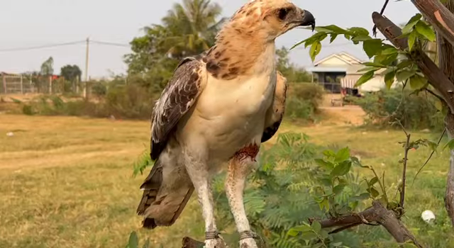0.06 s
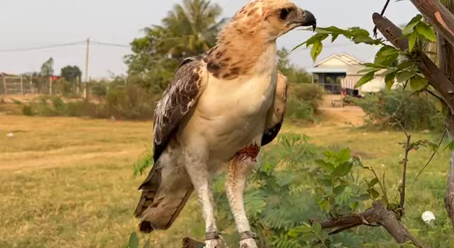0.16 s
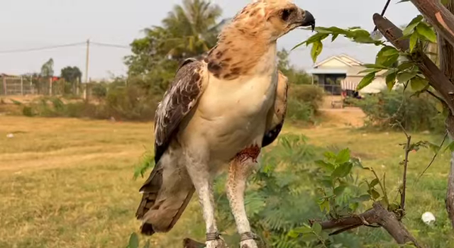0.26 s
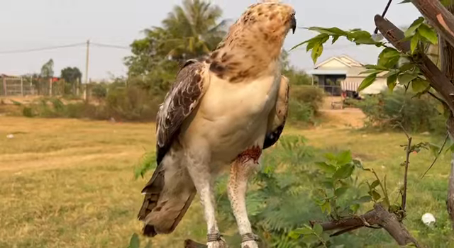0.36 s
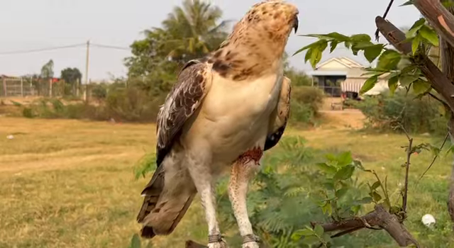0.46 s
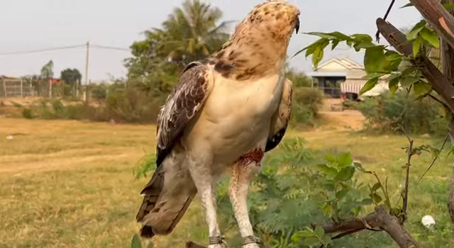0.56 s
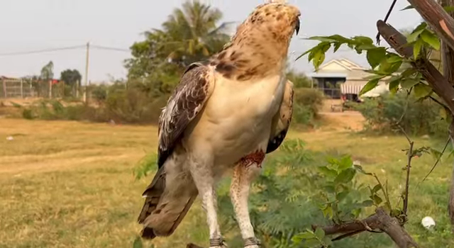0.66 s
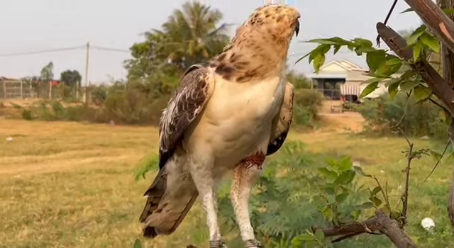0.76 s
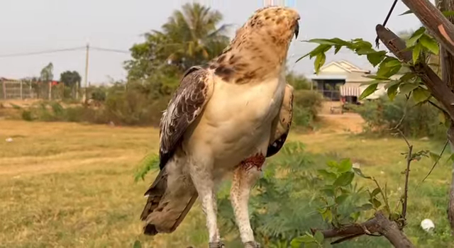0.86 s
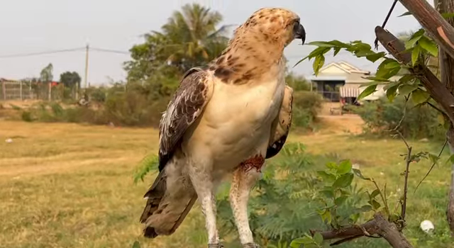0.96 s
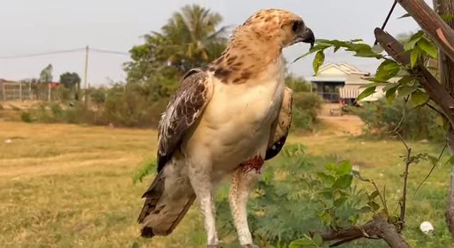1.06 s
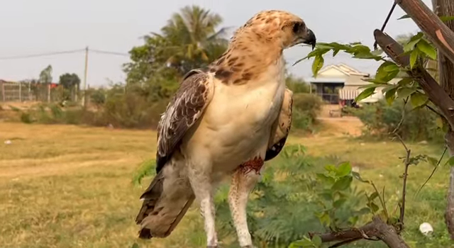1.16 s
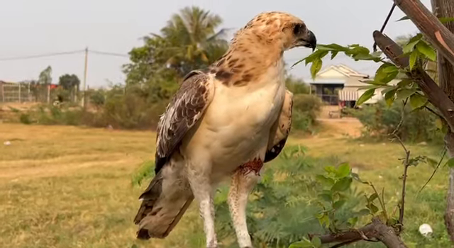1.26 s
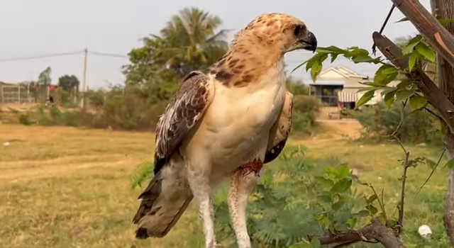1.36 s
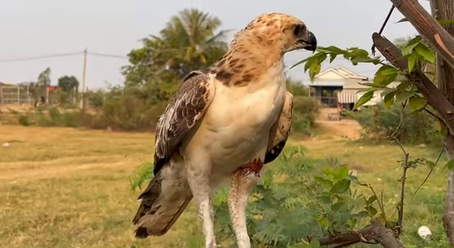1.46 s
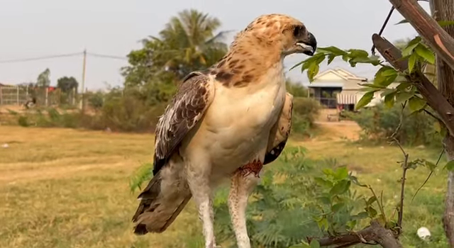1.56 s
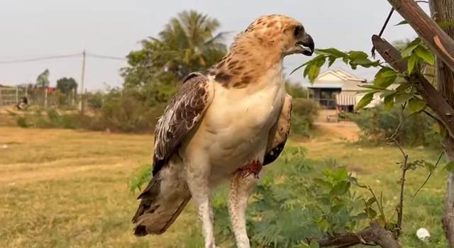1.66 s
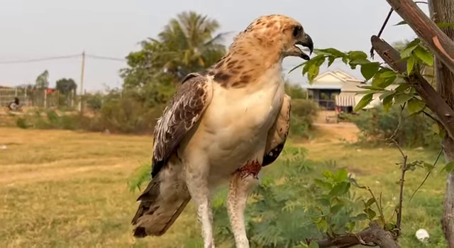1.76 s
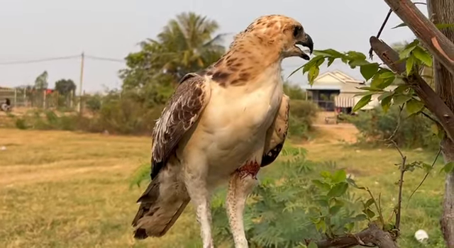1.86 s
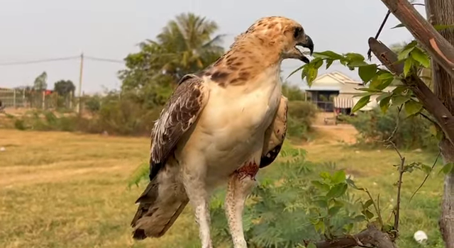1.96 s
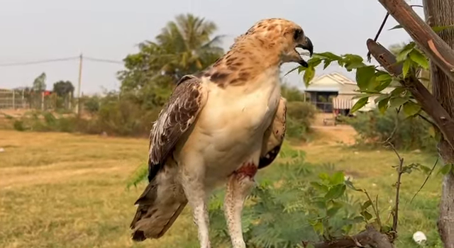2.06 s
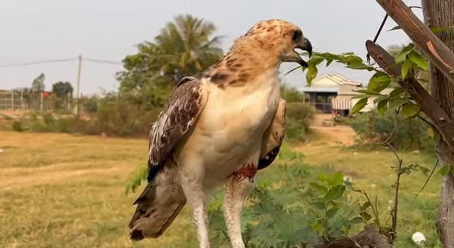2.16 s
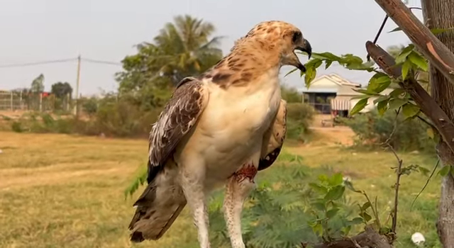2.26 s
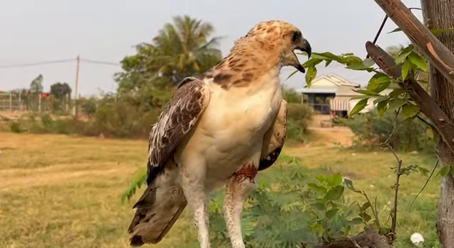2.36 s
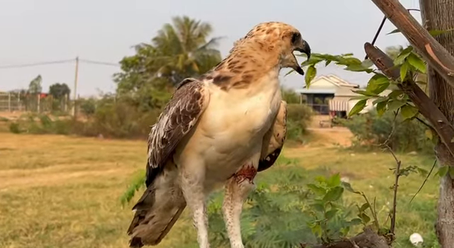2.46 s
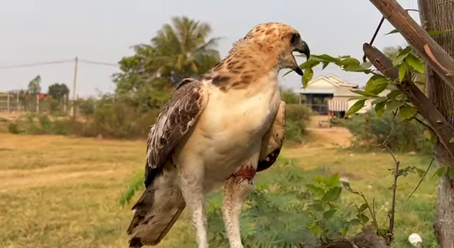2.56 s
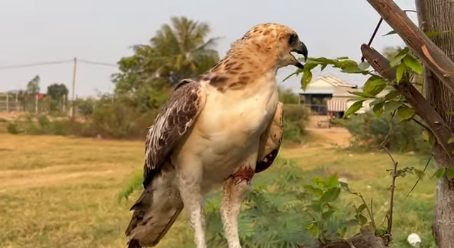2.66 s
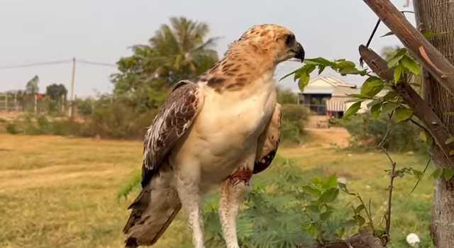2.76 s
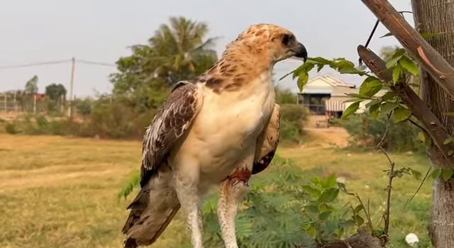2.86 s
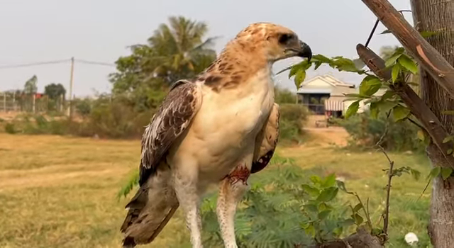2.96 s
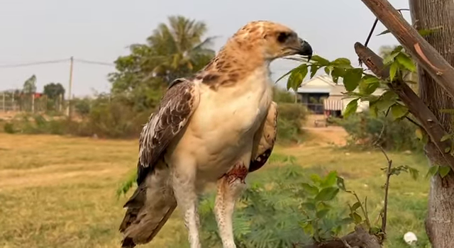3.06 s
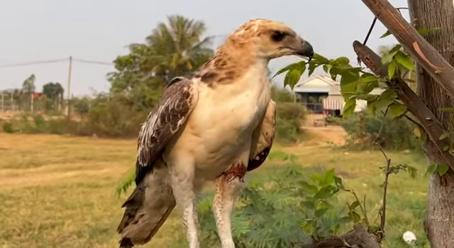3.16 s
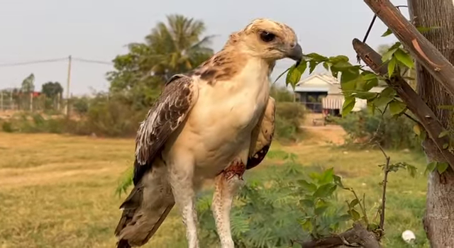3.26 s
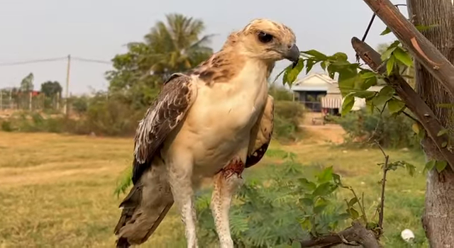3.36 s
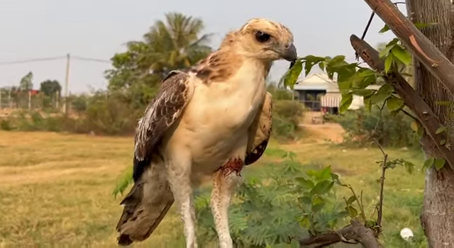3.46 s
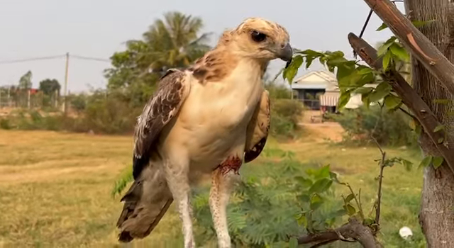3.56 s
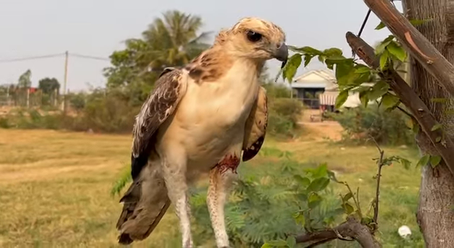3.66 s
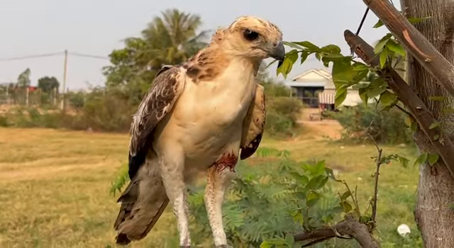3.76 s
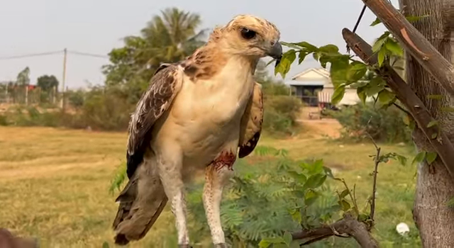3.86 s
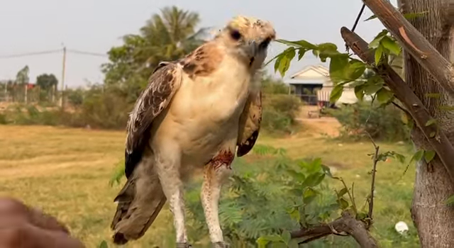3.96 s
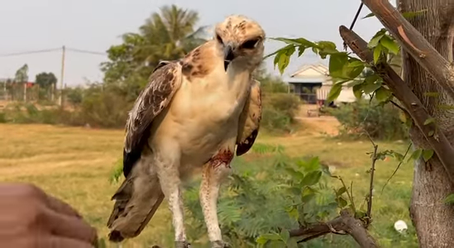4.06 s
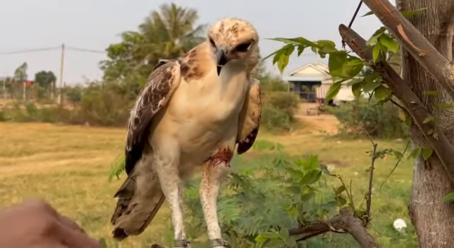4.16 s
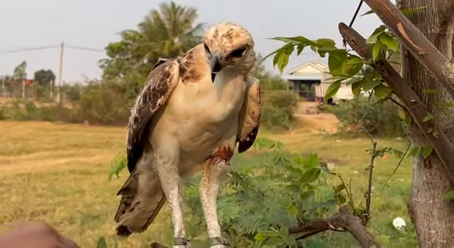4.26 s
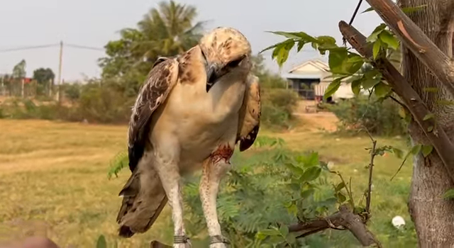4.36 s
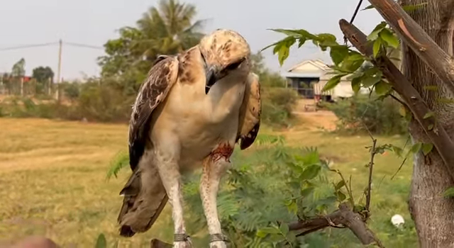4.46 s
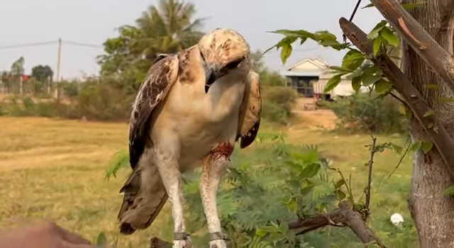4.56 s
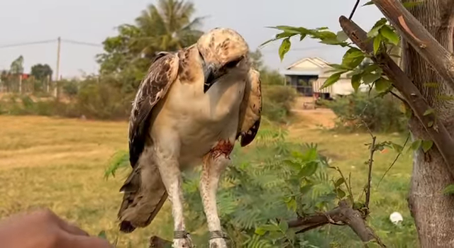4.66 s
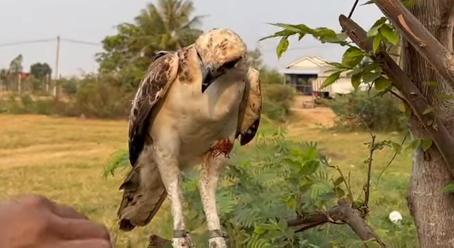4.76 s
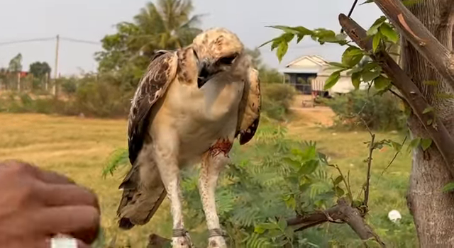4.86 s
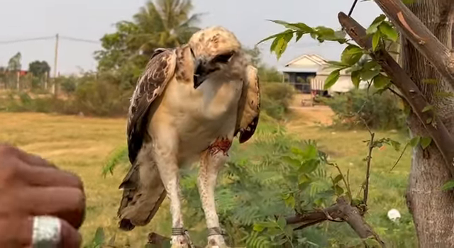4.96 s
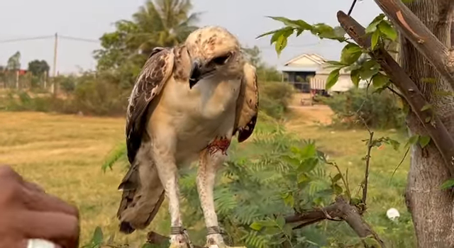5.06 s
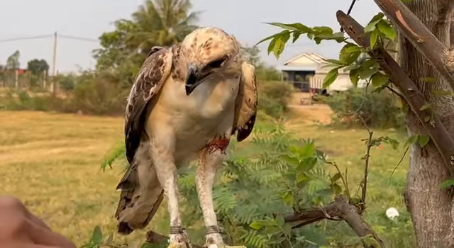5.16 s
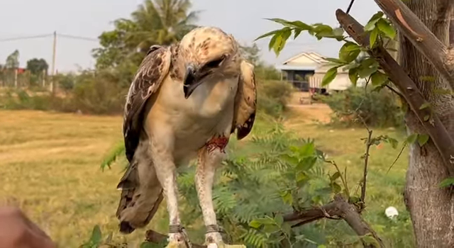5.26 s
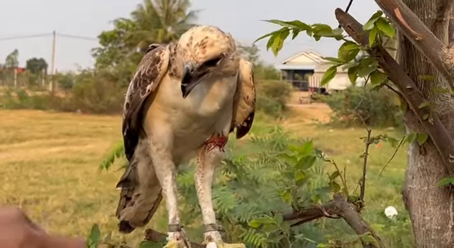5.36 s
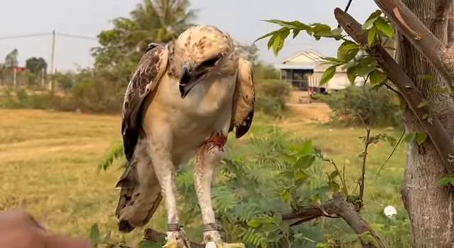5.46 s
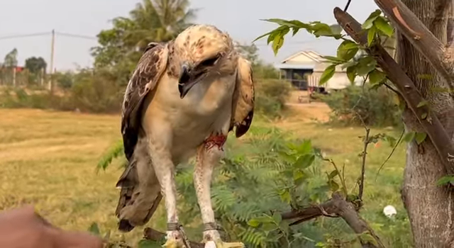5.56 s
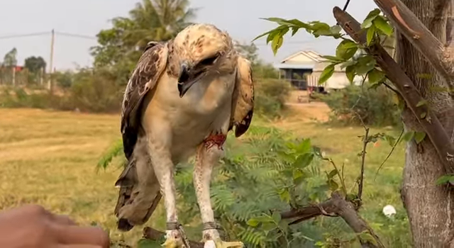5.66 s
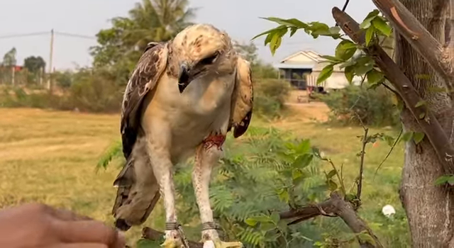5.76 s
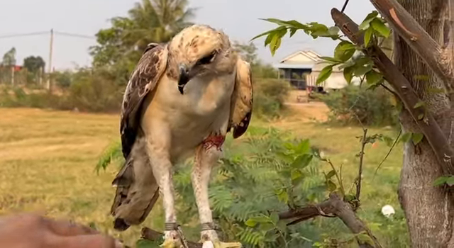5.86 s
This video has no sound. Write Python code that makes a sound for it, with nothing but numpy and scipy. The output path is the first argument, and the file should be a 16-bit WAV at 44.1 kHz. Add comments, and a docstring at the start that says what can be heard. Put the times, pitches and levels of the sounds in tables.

```python
"""An open field: a young eagle on a perch calls twice, close to a hand-held camera.
First a rising run of whistles, head turned aside, the last one breaking upward; then, facing the camera,
four brighter yelps, each led by a falling squeak. The voice is a gliding tone with overtones and some air.
Fingers rub and bump the camera (shaped noise, thuds) over low humming glides; leaves rustle, twigs and beak
tick (noise bands). Far off a dog yaps (blurred resonances); short high chirps glide, most from a small bird."""
import sys
import numpy as np
from scipy import signal
from scipy.fft import rfft, irfft, next_fast_len
from scipy.io import wavfile
from scipy.ndimage import map_coordinates

SR = 44100
rng = np.random.default_rng(int(sys.argv[2]) if len(sys.argv) > 2 else 0)


def bounce(signal):
    """Save signal as a 16-bit WAV file at the path given by the first command-line argument."""
    frames = np.transpose(np.atleast_2d(signal))
    limited = np.clip(frames, -1, 1)
    pcm = np.round(limited * 32767).astype(np.int16)
    wavfile.write(sys.argv[1], SR, pcm)


N = 260939

# spells in which the fingers shift on the camera: centre_s, half_width_s, rise_db over a still grip
FINGER_SHIFTS = [(0, 0.15, 9), (.3, .75, 10.5), (1.68, 0.44, 15), (2.6, 0.31, 10.5), (3.72, 0.3, 12.5),
                 (4.1, 0.16, 12.5), (4.75, 0.54, 13), (5.34, 0.088, 8)]
# colour of the handling rumble: freq_hz, relative_db
RUMBLE_COLOUR = [(20, -27), (35, -9), (55, 3.5), (95, 3.5), (145, -4.5), (240, -15), (450, -29), (800, -49),
                 (1300, -120)]
# fingers bump the camera: start_s, thud_db, knock_db relative to the thud (both before the bump trims)
FINGER_BUMPS = [(0.033, -29, -23), (0.175, -27.5, -20), (0.235, -25, -43), (0.331, -33, -30),
                (0.423, -33, -17), (0.513, -35, -19), (1.747, -29.5, -13.5), (1.866, -28, -18.5),
                (2.177, -31.5, -18), (2.796, -38, -19), (3.503, -34, -24), (3.669, -37.5, -13),
                (3.996, -31, -16.5), (4.074, -23.5, -39), (4.417, -30, -9), (5.331, -35, -21),
                (5.436, -30, -16), (5.794, -43, -22.5)]
# low humming glides: start_s, length_s, start_hz, end_hz, level_db
LOW_GLIDES = [(1.37, .13, 124.2, 108, -35), (1.64, 0.093, 100, 98.4, -34.5), (2.11, 0.11, 97.7, 103.3, -36),
              (2.3, 0.08, 122.4, 97, -37), (3.78, 0.16, 104.4, 82.1, -38), (4.04, 0.081, 139, 145.5, -32.5),
              (4.43, 0.29, 159.5, 109.3, -37), (4.65, 0.18, 106.3, 100.1, -34), (4.95, 0.12, 82, 78.2, -39)]
# the foliage's soft stir, before its trim: time_s, level_db
STIR_LEVEL = [(0.0, -60), (1.47, -62), (3.1, -68.5), (3.91, -65.5), (4.94, -68.5), (5.39, -63), (5.92, -76)]
# colour of the soft stir: freq_hz, relative_db
STIR_COLOUR = [(180, -31), (300, -4.5), (527, -6.5), (676, -4.5), (796, -9), (877, -7.5), (1490, -11),
               (4000, -22.5), (5200, -45), (8800, -120)]
# puffs of air in the leaves: centre_s, half_width_s, rise_db over calm
AIR_PUFFS = [(.32, 0.38, 6), (1.06, 0.21, 8.5), (2.1, 0.89, 9.5), (3.27, 0.051, 5), (3.63, 0.056, 6.5),
             (4.2, 0.92, 4.5)]
# colour of the leaves' hiss: freq_hz, relative_db
HISS_COLOUR = [(1200, -12.5), (2500, -1.5), (4500, 0), (6500, -3.5), (8300, -8.5), (9500, -29),
               (12000, -30.5)]
# dry ticks, low ones from twigs and leaves, the two high ones clicks of the beak:
# start_s, level_db, centre_hz
DRY_TICKS = [(.175, -43.5, 1450), (.257, -49, 2280), (0.376, -44, 1060), (.427, -49, 2640),
             (1.465, -60, 5460), (1.731, -61, 5000)]
# a dog yaps a long way off, before the distant mix: centre_s, level_db, centre_hz
DOG_YAPS = [(1.06, -53, 893), (1.36, -55, 800), (1.92, -57, 963), (2.3, -55.5, 914), (3.58, -55, 941),
            (3.75, -55, 662)]
# short high gliding chirps, the first the eagle's own thin squeak, the rest a far small bird,
# before the distant mix: start_s, length_s, start_hz, end_hz, level_db
HIGH_CHIRPS = [(1.24, .045, 5500, 4250, -67), (1.85, 0.02, 4930, 3590, -62.5),
               (1.935, .03, 4900, 4200, -68), (3.51, 0.025, 5300, 4400, -60.5),
               (3.76, 0.021, 3700, 4900, -65), (3.775, 0.028, 6000, 5900, -58),
               (3.805, 0.029, 4900, 4000, -57.5), (3.85, 0.051, 3200, 4600, -66),
               (4.024, 0.021, 4700, 4150, -62)]
# the rising run: start_s, length_s, pitch_hz, climb_hz_per_s, scoop_from_below_hz, final_fall_hz,
# fundamental_db, overtones_db
WHISTLE_NOTES = [(1.283, 0.066, 1430, 1, 87, 106, -39, -49), (1.349, 0.022, 1462, 1, 31, 16.5, -36, -49),
                 (1.533, 0.08, 1823, -0.5, 237, 329, -18.5, -31.5),
                 (1.767, .072, 1856, 0, 172, 200, -13, -27), (1.99, 0.087, 2050, 1, 326, 200, -6.3, -24),
                 (2.217, .219, 2040, 252.5, 290, 0, -8, -25),
                 (2.437, 0.18, 2392, -141, 54, 206, -13.5, -22),
                 (2.619, .012, 1896, -1.5, 10, 39.5, -30, -55)]
# the yelps: the same columns as the rising run
YELP_NOTES = [(4.385, 0.064, 1687, -2, 46, 285, -22, -21),
              (4.666, 0.06, 1848, -2.5, 130.9, 385, -16, -15.5),
              (4.934, .08, 1896, -2, 92.96, 285, -21.5, -14.3), (5.223, 0.46, 1921, 131, 62, 375, -21, -15)]
# the thin squeak that falls into each yelp:
# start_s, length_s, start_hz, lateness of the fall (a power), level_db before the beak's resonance
SQUEAK_NOTES = [(4.355, 0.028, 3875, 1.08, -25.5), (4.626, 0.039, 5300, 1.34, -18),
                (4.886, .044, 4697, 5, -16), (5.179, .042, 4510, 4.6, -17)]
# throat and beak heard from the side, weighting the overtones: freq_hz, relative_db
THROAT_ASIDE = [(2800, 2), (4800, 0.5), (5400, 2.5), (5700, -6), (6150, -15.5), (7100, -14), (8200, -12),
                (8900, -11.5), (9500, -13), (10300, -25), (11300, -38.5), (11900, -27.5), (12400, -44)]
# throat and beak heard from the front: freq_hz, relative_db
THROAT_FACING = [(3900, -1), (4950, -7.5), (5600, -6.5), (6600, -11), (7400, -10.5), (8250, -20.5),
                 (9300, -12), (9800, -11), (10500, -22.5), (11200, -23.5), (11700, -32), (12300, -41)]
# a note still under its pitch is softer: fundamental_db_per_hz, overtones_db_per_hz
SCOOP_SOFTENING = (0.0384, 0.008)
# a note fades as it falls: fundamental_db_per_hz, overtones_db_per_hz
FALL_FADING = (0.0673, 0.07)
# the fundamental alone dips or swells within a note: centre_s, half_width_s, change_db
FUNDAMENTAL_SWELLS = [(2.368, 0.052, -16), (2.598, 0.014, 6), (5.0, .012, 5.5), (5.56, .08, 5.5)]
# the voice roughens under strain: centre_s, half_width_s, flutter_depth
VOICE_STRAINS = [(2.002, .01, 0.02), (2.325, .028, 0.01), (2.434, .018, 0.03)]
# held notes gain lines halfway between their harmonics: centre_s, half_width_s, strength
HALFWAY_SPELLS = [(2.325, 0.038, 1.9), (2.56, .055, 1.3), (5.5, 0.2, 1.01)]
# decay of the far echo: freq_hz, t60_s
FIELD_DECAY = [(500, .5), (2300, 1), (5000, 0.62), (11000, 0.26)]
# phase by which the left microphone port leads: freq_hz, lead_rad
PORT_LEAD = [(2200, 0), (3300, .65), (4800, .45), (6600, .05), (7800, .5), (8800, -.6), (9400, -2),
             (9900, -2.7), (10400, -3.5), (11700, -6)]

GRIP_DB, CALM_DB = -54, -73.5  # handling with a still grip; leaf hiss in calm air
SCOOP_HZ_PER_S, FALL_S = 5000, 0.016  # initial speed of the scoop; time constant of the final fall
# onset time constant of a note whose overtones are at LOUD_DB; it doubles for each SLOWER_PER_DB softer
BUILD_S, LOUD_DB, SLOWER_PER_DB = 0.0008, -14, 15
SQUEAK_BUILD_S, SQUEAK_END_HZ = 0.00088, 2663  # onset time constant; pitch where the full voice catches
BEAK_HZ, BEAK_WIDTH_HZ = 3680, 356  # the resonance a squeak slides through; its half width
TOP_HZ = 12500  # the camera's band limit


def amp(db):
    """Decibels to gain."""
    return 10 ** (np.asarray(db) / 20)


def unit(x):
    """x at rms 1."""
    return x / np.sqrt(np.mean(x ** 2) + 1e-20)


def along(points, hz):
    """Read a curve of (Hz, value) points on a log frequency axis."""
    freqs, values = np.transpose(points)
    return np.interp(np.log(hz + 1), np.log(freqs + 1), values)


def swells(rows, t):
    """Summed bell-shaped rises and dips at times t."""
    return sum(height * np.exp(-((t - s) / width) ** 2) for s, width, height in rows)


def wobble(rate, size=N):
    """A smooth random curve, rate knots a second."""
    knots = rng.standard_normal(int(N * rate / SR) + 4)
    return map_coordinates(knots, [np.arange(size) * rate / SR])


def filtered(x, response):
    """Shape x by a response given as a function of frequency."""
    m = next_fast_len(N + SR // 4)
    return irfft(rfft(x, m) * response(np.fft.rfftfreq(m, 1 / SR)), m)[..., :N]


def add(track, s, x):
    """Mix x into the track from time s."""
    part = track[max(round(s * SR), 0):][:len(x)]
    part += x[:len(part)]


def rush(spectrum, side_db):
    """Coloured stereo noise of rms 1."""
    mid, side = filtered(rng.standard_normal((2, N)), lambda hz: amp(along(spectrum, hz)))
    side = amp(side_db) * side
    return unit(np.array([mid + side, mid - side]))


def glides(rows, octave_db, waver):
    """Short swelling tones that slide from one pitch to another, with a faint octave."""
    out = np.zeros(N)
    for s, length, start_hz, end_hz, db in rows:
        u = np.linspace(0, 1, round(length * SR))
        pitch = (start_hz + (end_hz - start_hz) * u) * (1 + waver * wobble(69, len(u)))
        phase = 2 * np.pi * np.cumsum(pitch) / SR
        swell = np.sqrt(2 * np.abs(np.sin(np.pi * u)))
        add(out, s, amp(db) * swell * (np.sin(phase) + amp(octave_db) * np.sin(2 * phase)))
    return out


def bumps(thud_hz, thud_t60, thud_db, knock_db):
    """Each soft bump rocks the case for a few cycles and adds a short hollow knock, stronger in hard bumps."""
    out, t = np.zeros(N), np.arange(SR // 8) / SR
    band = signal.butter(2, [200, 520], "band", fs=SR, output="sos")
    for s, db, hard_db in FINGER_BUMPS:
        hz = thud_hz * np.exp(.08 * rng.standard_normal())  # each bump lands a little off
        rocking = np.sin(2 * np.pi * hz * t) - 0.59 * np.sin(2 * np.pi * .62 * hz * t)
        thud = rocking * amp(-60 * t / thud_t60) * (1 - np.exp(-t / 0.0012))
        knock = signal.sosfilt(band, amp(-60 * t / 0.088) * rng.standard_normal(len(t)))
        add(out, s, amp(db + thud_db) * thud / np.abs(thud).max())
        add(out, s, amp(db + hard_db + knock_db) * knock / np.abs(knock).max())
    return out


def handling():
    """Rumble and bumps reach both microphones through the case."""
    shift_db = GRIP_DB + swells(FINGER_SHIFTS, np.arange(N) / SR)
    rumble = amp(shift_db) * amp(1.8 * wobble(25)) * rush(RUMBLE_COLOUR, side_db=-8.0)
    return rumble + bumps(thud_hz=191, thud_t60=0.027, thud_db=-0.5, knock_db=3)


def foliage():
    """Leaves stir: a soft body of sound and a grainy hiss that swells with puffs of air."""
    t = np.arange(N) / SR
    stir_db = np.interp(t, *np.transpose(STIR_LEVEL)) + 3
    hiss_db = CALM_DB + swells(AIR_PUFFS, t)
    body = amp(stir_db + 0.62 * wobble(27)) * rush(STIR_COLOUR, side_db=-6.0)
    return body + amp(hiss_db + 0.54 * wobble(150)) * rush(HISS_COLOUR, side_db=-16.5)


def ticks(t60):
    """Dry ticks of twigs, leaves and beak, each a broad burst of noise round its own pitch."""
    out, t = np.zeros(N), np.arange(SR // 20) / SR
    for s, db, hz in DRY_TICKS:
        band = signal.butter(2, [hz / 1.7, hz * 1.51], "band", fs=SR)
        burst = unit(signal.lfilter(*band, rng.standard_normal(len(t))))
        add(out, s, amp(db - 60 * t / t60) * burst)
    return out


def yaps(blur_rate, half_width_s):
    """Distance leaves only the main resonance of each yap, blurred."""
    out, t = np.zeros(N), np.arange(N) / SR
    blur = unit(wobble(blur_rate)) + 1j * unit(wobble(blur_rate))
    for s, db, hz in DOG_YAPS:
        swell = np.exp(-((t - s) / half_width_s) ** 2)
        out += amp(db) * swell * np.real(blur * np.exp(2j * np.pi * hz * t))
    return out


def chirps():
    """Short high chirps are nearly pure gliding tones: first the eagle's thin squeak, then a far small bird."""
    return glides(HIGH_CHIRPS, octave_db=-38.0, waver=0.024)


def low_hums():
    """Low humming glides swell and slide a little in pitch."""
    return glides(LOW_GLIDES, octave_db=-25.5, waver=.025)


def gated(s, length, edge, lead):
    """Times and soft-edged gate of one note."""
    start, end = s - edge - lead, s + length + edge
    t = np.arange(round(start * SR), round(end * SR)) / SR
    ramp = np.clip(np.minimum(t - start, end - t) / (2 * edge), 0, 1)
    return t, np.sin(np.pi / 2 * ramp) ** 2


def soft_onset(s, build_s, t):
    """Level in dB of a soft onset around time s."""
    return -20 * np.log10(1 + np.exp((s - t) / build_s))


def voicing(note, jitter):
    """A note builds up, scoops to its pitch, holds and falls away; the further under pitch, the softer it is."""
    s, length, hz, climb, scoop_hz, fall_hz, base_db, over_db = note
    t, gate = gated(s, length, edge=0.0018, lead=0.0091)
    age, left = np.maximum(t - s, 0), np.maximum(s + length - t, 0)
    scoop = scoop_hz * np.exp(-age * SCOOP_HZ_PER_S / max(scoop_hz, 1))
    fall = fall_hz * np.exp(-left / FALL_S)
    pitch = (hz + climb * age - scoop - fall) * (1 + jitter * wobble(170, len(t)))
    phase = 2 * np.pi * np.cumsum(pitch) / SR
    # soft notes build up more slowly
    build_db = soft_onset(s, BUILD_S * 2 ** ((LOUD_DB - over_db) / SLOWER_PER_DB), t)
    # the overtones arrive just after the fundamental
    tops = base_db + build_db + swells(FUNDAMENTAL_SWELLS, t), over_db + 2 * build_db
    levels = [db - soft * scoop - fade * fall
              for db, soft, fade in zip(tops, SCOOP_SOFTENING, FALL_FADING)]
    return t, gate, phase, pitch, levels


def overtone_weights(throat, pitch, over_db, k):
    """Throat and beak share the overtone level among harmonics k, each of which wavers."""
    # soft notes are purer: their upper overtones drop away
    weights = amp(along(throat, k * pitch) - 0.56 * (k - 2) * np.maximum(-25.5 - over_db, 0))
    waver_db = 0.64 * np.array([wobble(90, pitch.size) for _ in k])
    return weights / np.linalg.norm(weights, axis=0) * amp(over_db + waver_db)


def halfway_lines(phase):
    """Every other cycle grows a little, giving faint unsteady lines halfway between harmonics."""
    lines = 0
    for order, db in [(3 / 2, -6), (5 / 2, -14), (7 / 2, 0)]:
        level = amp(db + 6 * wobble(18, len(phase)))
        lines = lines + level * np.sin(order * phase + .5 * wobble(160, len(phase)))
    return lines


def throat_air(hiss_hz, t):
    """Air turbulence sings faintly in narrow bands of the throat."""
    return sum(wobble(220, len(t)) * amp(4 * wobble(16, len(t))) * np.sin(2 * np.pi * hz * t)
               for hz in hiss_hz)


def call(notes, throat, hiss_hz, jitter, onset_rasp, half_db, air_db):
    """The syrinx whistles; throat and beak weight its overtones."""
    out, k = np.zeros(N), np.arange(2, 8)[:, None]  # harmonic numbers
    for note in notes:
        t, gate, phase, pitch, (base_db, over_db) = voicing(note, jitter)
        weights = overtone_weights(throat, pitch, over_db, k)
        # the membranes flutter until the note settles
        age = np.maximum(t - note[0], 0)
        rasp = onset_rasp * np.exp(-age / 0.012) + swells(VOICE_STRAINS, t)
        phase = phase + rasp * wobble(1400, len(t))
        tone = amp(base_db) * np.sin(phase) + np.sum(weights * np.sin(k * phase), axis=0)
        half = swells(HALFWAY_SPELLS, t) * amp(half_db) * halfway_lines(phase)
        draught = np.minimum(age / 0.077, 1) * np.exp(-age / 0.67)
        air = draught * amp(air_db) * throat_air(hiss_hz, t)
        flutter = 1 + 0.38 * rasp * wobble(1500, len(t))
        add(out, t[0], np.sqrt(2) * gate * (tone + amp(over_db) * (half + air)) * flutter)
    return out


def squeaks(jitter, octave_db, rasp):
    """A high, slightly hoarse whistle slides down through the beak's resonance until the full voice catches."""
    out = np.zeros(N)
    for s, length, hz, lateness, peak_db in SQUEAK_NOTES:
        t, gate = gated(s, length, edge=0.0013, lead=0.0079)
        pitch = hz + (SQUEAK_END_HZ - hz) * np.clip((t - s) / length, 0, 1) ** lateness
        phase = 2 * np.pi * np.cumsum(pitch * (1 + jitter * wobble(170, len(t)))) / SR
        beak_db = -10 * np.log10(1 + ((pitch - BEAK_HZ) / BEAK_WIDTH_HZ) ** 2)
        level = amp(peak_db + soft_onset(s, SQUEAK_BUILD_S, t) + beak_db)
        octave_level = amp(octave_db + 1.7 * wobble(200, len(t)))
        octave = octave_level * np.sin(2 * phase + .5 * wobble(1000, len(t)))
        flutter = amp(1.5 * wobble(220, len(t))) * (1 + rasp * wobble(5000, len(t)))
        add(out, t[0], np.sqrt(2) * gate * level * flutter * (np.sin(phase) + octave))
    return out


def echo(x, far_db, near_db, near_t60):
    """Ground and bushes scatter the sound almost at once; far trees answer faintly."""
    hz, t, grid = signal.stft(rng.standard_normal((2, SR)), SR, nperseg=256)
    decay = amp(-60 * t / along(FIELD_DECAY, hz)[:, None])
    far = signal.istft(grid * decay, SR, nperseg=256)[1][:, :SR]
    near = rng.standard_normal((2, SR)) * amp(-60 * np.arange(SR) / SR / near_t60)
    far = amp(far_db) * far / np.linalg.norm(far[0])
    near = amp(near_db) * near / np.linalg.norm(near[0])
    mid, side = far + near
    tail = np.array([mid + 0.5 * side, mid - 0.77 * side])
    delayed = np.pad(x, (SR // 200, 0))  # 5 ms
    return signal.fftconvolve(delayed[None], tail, axes=1)[:, :N]


def at_ports(x):
    """Sound from the front reaches the two ports equally loud but out of step."""
    sides = np.array([[1], [-1]]) / 2
    return filtered(x, lambda hz: np.exp(1j * sides * along(PORT_LEAD, hz)))


def scene():
    """The eagle in front, the field around it, the hand on the camera."""
    distant = yaps(blur_rate=240, half_width_s=0.038) + chirps()
    distant = 0.52 * distant + echo(distant, far_db=-9, near_db=-3.5, near_t60=.15)
    whistles = call(WHISTLE_NOTES, THROAT_ASIDE, hiss_hz=(4950, 5350), jitter=0.0029,
                    onset_rasp=0.055, half_db=-32, air_db=-41)
    yelps = call(YELP_NOTES, THROAT_FACING, hiss_hz=(2407, 3300, 6300, 8350), jitter=0.0017,
                 onset_rasp=0.054, half_db=-32.5, air_db=-38.5)
    yelps = yelps + squeaks(jitter=0.019, octave_db=-17.5, rasp=0.048)
    # turned aside, the eagle sends more of its call into the trees
    field = echo(whistles, far_db=-41.0, near_db=-20.5, near_t60=0.1)
    field = field + echo(yelps, far_db=-51, near_db=-17.5, near_t60=0.063)
    surroundings = foliage() + ticks(t60=0.041) + distant + low_hums()
    return handling() + surroundings + at_ports(whistles + yelps) + field


def record(dry):
    """The camera keeps next to nothing above its band limit."""
    return filtered(dry, lambda hz: 1 / (1 + (hz / TOP_HZ) ** 80))


dry = scene()
out = record(dry)
bounce(out)
```